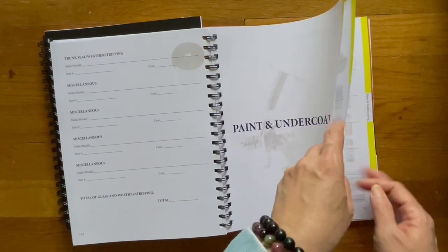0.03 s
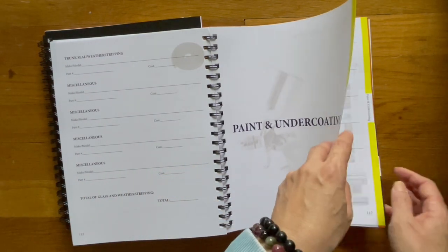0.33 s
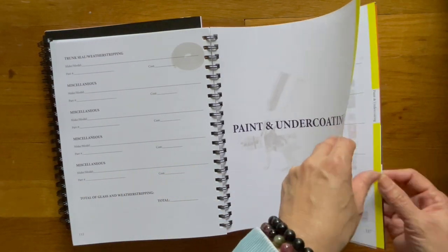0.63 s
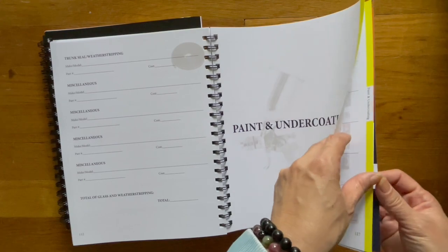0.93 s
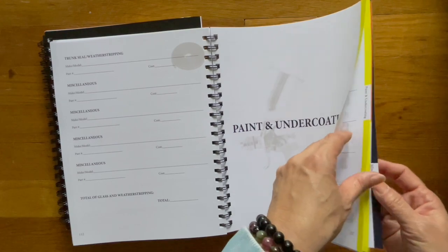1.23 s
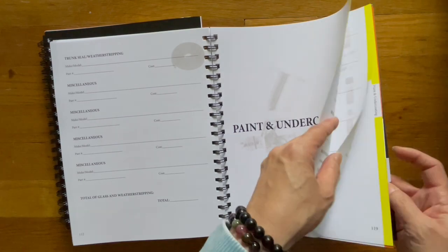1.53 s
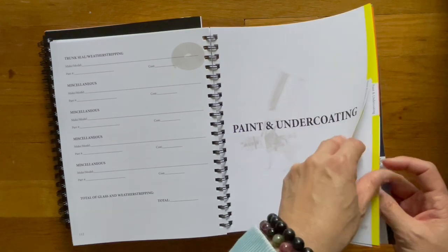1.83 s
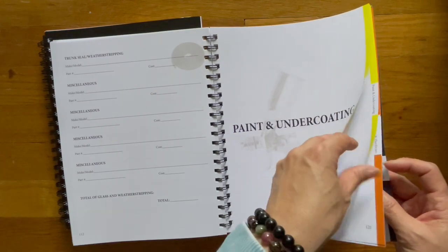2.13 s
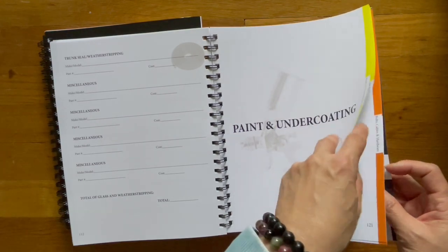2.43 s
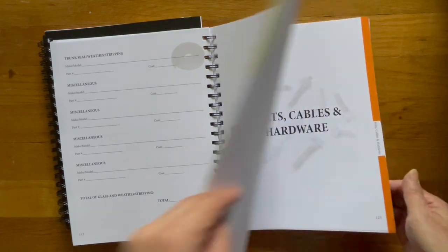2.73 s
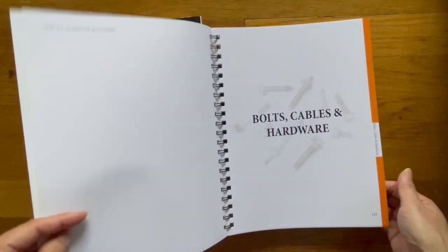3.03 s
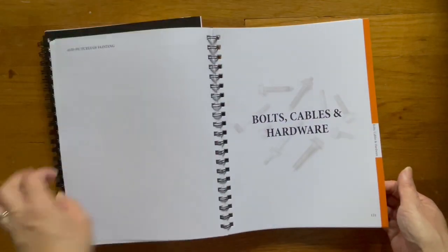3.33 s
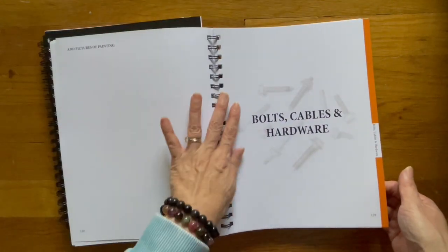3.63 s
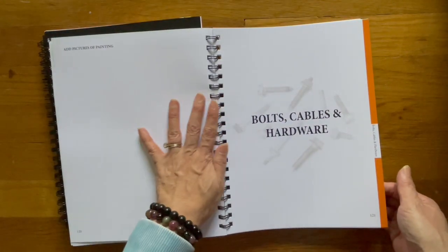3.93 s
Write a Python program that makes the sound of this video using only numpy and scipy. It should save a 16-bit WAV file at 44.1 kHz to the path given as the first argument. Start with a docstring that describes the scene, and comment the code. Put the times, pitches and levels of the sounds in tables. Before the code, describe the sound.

Stiff paper pages rustle as fingers pick through a spiral-bound book. A page swings over with sharp crackles, then a palm slaps and smooths it. Soft table thuds and a faint ticking clock are heard in the quiet room.

```python
"""In a quiet room, where a clock ticks faintly, fingers leaf through a spiral-bound book of stiff paper.
First the sheets slide and rub with a frictional hiss as a page is picked out. The page then bows and
swings over, ringing as it bends and crackling as it buckles. Last it settles, and a palm slaps and
smooths it. Throughout, the handling thuds softly through the wooden table."""
import sys
import numpy as np
from scipy import signal
from scipy.fft import rfft, irfft, next_fast_len
from scipy.io import wavfile

SR = 44100
rng = np.random.default_rng(int(sys.argv[2]) if len(sys.argv) > 2 else 0)


def dump(signal):
    """Clip the signal to [-1, 1] and save it as 16-bit WAV at the path in sys.argv[1]."""
    limited = np.clip(np.atleast_2d(signal).T, -1, 1)
    pcm = np.round(limited * 32767).astype(np.int16)
    wavfile.write(sys.argv[1], SR, pcm)


N = 176400
T = np.arange(N) / SR


def from_db(db):
    """Decibels to amplitude ratio."""
    return 10 ** (np.asarray(db) / 20)


def rms_one(x):
    """Scale to unit rms."""
    return x / np.sqrt(np.mean(x ** 2) + 1e-20)


def at_hz(points, hz):
    """Interpolate on a log-frequency axis."""
    f, v = np.transpose(points)
    return np.interp(np.log(np.maximum(hz, 1)), np.log(f), v)


def filtered(x, response):
    """Linear filtering: multiply the spectrum by a frequency response."""
    size = next_fast_len(x.shape[-1] + 4096)
    return irfft(rfft(x, size) * response(np.fft.rfftfreq(size, 1 / SR)), size)[..., :x.shape[-1]]


def drift(corner_hz, size=N):
    """Random fluctuation: low-passed noise of unit rms."""
    return rms_one(filtered(rng.standard_normal(size), lambda f: 1 / (1 + (f / corner_hz) ** 2)))


def coloured(source, spectrum):
    """Partial coherence: shaped mid and side noises add and subtract into two channels of unit rms."""
    # Each row: frequency in Hz, left-right coherence (clipped to 0..1).
    likeness = [(100, 5), (300, 0.4), (600, 0.2), (1200, 0.44), (2000, 1.3), (3000, -0.1), (4400, .5),
                (6000, 0.83), (8000, 0.95), (9400, .995), (11000, 9), (15000, -5)]
    alike = lambda f: np.clip(at_hz(likeness, f), 0, 1)
    gain = lambda f: from_db(at_hz(spectrum, f))
    mid = filtered(source, lambda f: gain(f) * np.sqrt(1 + alike(f)))
    side = filtered(rng.standard_normal(N), lambda f: gain(f) * np.sqrt(1 - alike(f)))
    return rms_one(np.array([mid + side, mid - side]))


def swells(rows, db_column=3, shape=1.86):
    """Incoherent addition: the envelopes of movements that swell and fade sum in power."""
    power, t = 0, T[::16]
    for row in rows:
        peak_s, rise_s, fall_s = row[:3]
        distance = np.abs(t - peak_s) / np.where(t < peak_s, rise_s, fall_s)
        power += from_db(row[db_column]) ** 2 * np.exp(-np.minimum(distance ** shape, 40))
    return np.interp(T, t, np.sqrt(power))


def add(out, start_s, sound):
    """Superpose a sound at a given time."""
    i = int(np.clip(start_s * SR, 0, N))
    out[i:i + len(sound)] += sound[:N - i]


def room_noise(level_db=-53.5):
    """Stationary noise, strongest in the bass, forms the room's background."""
    # Each row: frequency in Hz, relative spectral density in dB.
    spectrum = [(18, -28), (40, -5), (68, 2), (95, -6.5), (130, -4.5), (200, -15), (320, -17.5),
                (550, -21.5), (900, -24), (1500, -28), (3000, -37.5), (6000, -54.5), (11000, -72),
                (16000, -73)]
    return from_db(level_db) * coloured(rng.standard_normal(N), spectrum)


def clock(first_s=0.561, period_s=0.619, tock_lag_s=0.324, tick_db=-52, tock_db=-64):
    """Modal ringing: a strong and a weak beat excite the same damped modes, blurred by distance."""
    # Each row: frequency in Hz, relative level in dB, time to decay by 60 dB in seconds.
    modes = [(2180, 2.5, 0.22), (2853, -5, 0.29), (3710, 1, 0.22), (4300, -2.5, 0.19), (4920, 5, 0.063),
             (4820, -3.5, 0.26), (5300, -10, 0.19)]
    diffuse_share, blur_hz = 0.74, 170
    out, t = np.zeros((2, N)), T[:SR // 3]
    for beat in range(6):
        for lag_s, db in ((0, tick_db), (tock_lag_s, tock_db)):
            for channel in out:
                ring = 0
                for hz, mode_db, t60 in modes:
                    blur = 1 - diffuse_share + diffuse_share * drift(blur_hz, len(t))
                    tone = np.sin(2 * np.pi * (hz * t + rng.random()))
                    ring += from_db(mode_db - 60 * t / t60) * blur * tone
                add(channel, first_s + beat * period_s + lag_s, from_db(db) * ring)
    return out


def reverberation(x, t60_s=0.23, gain_db=-17):
    """Diffuse reflections arrive after 4 ms and decay exponentially, independently in each channel."""
    # Each row: frequency in Hz, further gain in dB.
    colour = [(100, -16), (400, -4), (1000, -3), (3000, -1), (7000, -3), (9400, -20), (14000, -15)]
    t = T[:SR // 2]
    tail = rng.standard_normal((2, len(t))) * from_db(-60 * t / t60_s) * (t > .004)
    tail = filtered(tail / np.linalg.norm(tail[0]), lambda f: from_db(gain_db + at_hz(colour, f)))
    return signal.fftconvolve(x.mean(axis=0)[None], tail, axes=1)[:, :N]


def thuds():
    """Forced vibration: the table booms as hands press the book on it, and the page pushes air."""
    # Each row: peak time, rise and fall in seconds, level in dB.
    pushes = [(0.085, 0.029, 0.054, -44), (0.55, 0.019, 0.014, -41.5), (0.62, 0.055, 0.058, -44.5),
              (0.85, 0.053, 0.015, -45.5), (1.095, 0.042, 0.022, -43.5), (1.2, 0.059, 0.059, -43),
              (1.375, 0.027, 0.026, -49), (1.67, .02, 0.022, -44), (1.79, 0.048, .05, -46.5),
              (2.015, .012, 0.011, -45), (2.12, 0.031, .05, -46.5), (2.34, 0.056, 0.026, -44),
              (2.49, 0.037, .08, -47), (2.75, 0.071, 0.18, -49), (2.925, 0.028, 0.046, -37.5),
              (3.015, 0.015, 0.063, -44.5), (3.35, 0.031, 0.084, -43), (3.46, 0.024, 0.046, -45),
              (3.85, 0.018, 0.033, -54)]
    # Each row: frequency in Hz, relative spectral density in dB.
    table_spectrum = [(18, -38), (35, -16.5), (54, -8.5), (62, -2.5), (69, 3.5), (76, 0), (88, -9),
                      (125, -8), (170, -16.5), (230, -16.5), (400, -34.5), (900, -93)]
    return swells(pushes) * coloured(rng.standard_normal(N), table_spectrum)


def bending_pulse(colour_db, ring_s, size=4096):
    """Dispersion: a pulse and its scatter arrive lows last. Energy equals 8 ms at unit rms."""
    delay_at_1khz_s, scatter_db = 0.001189, 0.5
    t, f = np.arange(size) / SR, np.fft.rfftfreq(size, 1 / SR)
    scatter = rng.standard_normal(size) * np.exp(-t / ring_s)
    pulse = (t == 0) + from_db(scatter_db) * scatter / np.linalg.norm(scatter)
    travel = np.exp(-4j * np.pi * delay_at_1khz_s * np.sqrt(1000 * f))
    wave = irfft(rfft(pulse) * travel * from_db(colour_db(f)))[:size // 2]
    return wave / np.linalg.norm(wave) * np.sqrt(.008 * SR)


def pats(width_octaves=0.51, top_hz=3150, scrape_decay_s=0.03):
    """Damped impact: a fingertip or loose page pats the stack and trails into a short scrape."""
    # Each row: start in seconds, level over 8 ms in dB, centre frequency in Hz.
    impacts = [(0.364, -58, 710), (0.588, -47, 980), (1.055, -48, 1020), (1.167, -56, 870),
               (1.979, -59.5, 840), (2.648, -34.5, 1140), (2.726, -47.5, 960), (3.410, -67, 910)]
    out, t = np.zeros(N), T[:SR // 5]
    for start_s, db, hz in impacts:
        band_loss = lambda f: 1 + (np.log2((f + 1) / hz) / width_octaves) ** 2
        colour_db = lambda f: -20 * np.log10(band_loss(f) * (1 + (f / top_hz) ** 2))
        scrape = rms_one(filtered(rng.standard_normal(len(t)), lambda f: from_db(colour_db(f))))
        scrape_db = -31 + 0.43 * db   # harder pats scrape louder
        add(out, start_s, from_db(db) * bending_pulse(colour_db, ring_s=0.0049))
        add(out, start_s, from_db(scrape_db) * scrape * np.exp(-t / scrape_decay_s))
    return out


def bends(relative_half_width=0.13):
    """Friction drives a gliding resonance of the bowed sheet: high under a finger, hollow in the swing."""
    # Each row: peak time, rise and fall in seconds, level in dB, centre in Hz, glide in octaves a second.
    resonances = [(1.635, 0.019, 0.03, -43, 1900, 2), (2.195, 0.012, 0.028, -44.5, 1700, 1.5),
                  (2.22, 0.022, 0.044, -49.5, 1100, 0.5), (2.285, 0.036, 0.04, -44, 1950, 1),
                  (2.62, 0.013, 0.01, -47, 2000, -3.5), (2.655, 0.0092, 0.011, -53.5, 400, -14),
                  (2.735, 0.0046, 0.017, -49, 280, -13), (2.835, 0.018, 0.028, -47.5, 3650, -0.5),
                  (2.889, 0.076, 0.071, -52, 2580, -1.5), (2.89, 0.041, .05, -56.5, 240, 1.5),
                  (3.0, 0.012, 0.065, -52, 2650, 0), (3.033, 0.021, 0.034, -48.5, 400, 2),
                  (3.045, .025, 0.021, -53, 820, 0.5)]
    out = np.zeros(N)
    for row in resonances:
        peak_s, _, _, _, hz, glide = row
        octaves = np.clip(glide * (T - peak_s), -1, 1)
        phase = 2 * np.pi * np.cumsum(hz * 2 ** octaves) / SR
        width_hz = relative_half_width * hz
        noise_band = drift(width_hz) * np.cos(phase) + drift(width_hz) * np.sin(phase)
        out += swells([row]) * rms_one(noise_band)
    return out


def sharp_clicks():
    """Impulsive excitation: snaps of the stiff sheet, plus a few faint clock ticks whole seconds apart."""
    # Each row: start in seconds, level over 8 ms in dB, tilt above 700 Hz in dB per octave.
    clicks = [(0.014, -48.5, -4.5), (0.150, -56.5, -11), (0.362, -50, -1.5), (0.369, -63, -2),
              (0.797, -51.5, 0), (1.268, -63, 4), (1.297, -59, -1), (1.338, -54.5, -8), (1.366, -46, -1),
              (1.447, -59, -9), (1.542, -50.5, -8), (1.737, -48.5, 0), (1.885, -49, 1.5), (2.014, -58.5, 3),
              (2.173, -49.5, -4), (2.385, -52.5, -7.5), (2.565, -46.5, -13), (2.617, -46.5, 4),
              (2.629, -54, 4), (2.717, -50.5, 1), (2.7882, -43, 2.5), (2.8069, -35, 1), (2.822, -44, -2),
              (2.831, -40, -5), (2.874, -43.5, -2.5), (2.886, -46, -5.5), (2.894, -44.5, -4),
              (2.902, -44, -3), (2.925, -49.5, -2), (2.981, -43, -3), (3.047, -36.5, 0.5),
              (3.0585, -34.5, -2.5), (3.063, -41.5, -3.5), (3.114, -50.5, 1.5), (3.128, -50.5, 1),
              (3.150, -54, 7), (3.203, -53, 0.5), (3.216, -46, -0.5), (3.262, -41, 1), (3.302, -39, -1),
              (3.306, -39, 1), (3.31, -41.5, 3), (3.3236, -39.5, 3), (3.335, -37, 1.5), (3.366, -48, -1),
              (3.3972, -40, 0), (3.407, -37.5, -1), (3.472, -57.5, 8), (3.590, -37.5, -2),
              (3.595, -35.5, 1.5), (3.601, -36, -2), (3.607, -37, 2), (3.619, -43, 1.5), (3.631, -44.5, -1),
              (3.639, -42.5, 3), (3.8453, -51, -5.5)]
    # Each row: frequency in Hz, relative spectral density in dB.
    spectrum = [(100, -42), (400, -8), (900, 2), (1600, 0), (2700, 4), (4200, -2.5), (5600, 0.5),
                (8000, -1.5), (10700, 4.5), (12000, -5), (13500, -26), (16000, -27)]
    out = np.zeros(N)
    for start_s, db, tilt in clicks:
        colour_db = lambda f: at_hz(spectrum, f) + tilt * np.log2(np.maximum(f, 700))
        add(out, start_s, from_db(db) * bending_pulse(colour_db, ring_s=0.0026))
    return out


def friction(slips_per_s=2500, spread_db=3.5, slip_share=0.46):
    """Stick-slip: fibres catch and let go in uneven impulses over smooth sliding noise."""
    slips = (rng.random(N) < slips_per_s / SR) * rng.choice([-1, 1], N)
    sizes = from_db(spread_db * np.minimum(rng.exponential(1, N), 5))
    smooth = rng.standard_normal(N)
    return np.sqrt(slip_share) * rms_one(slips * sizes) + np.sqrt(1 - slip_share) * smooth


def sliding(judder_db=1.9, judder_hz=29):
    """Friction on paper or skin excites surface hiss, the rubbed sheet's resonance and its low flexing."""
    # Each row: peak time, rise and fall in seconds, then hiss, rub and flex levels in dB.
    strokes = [(0.012, 0.025, 0.012, -48.5, -54, -52), (0.07, 0.041, 0.05, -52, -75, -64),
               (0.115, 0.01, 0.009, -47, -60, -63), (0.28, 0.011, 0.019, -53.5, -61.5, -64.5),
               (0.455, 0.015, 0.017, -55, -53.5, -53), (0.512, 0.016, 0.032, -52.5, -59, -54.5),
               (0.795, 0.044, 0.018, -56, -61.5, -56.5), (0.942, 0.0038, 0.022, -58, -83, -79),
               (1.118, 0.007, 0.011, -55.5, -60, -54), (1.41, 0.021, 0.056, -58, -53.5, -63),
               (1.482, 0.019, 0.05, -43.5, -46, -57.5), (1.63, 0.031, 0.04, -49, -47.5, -59.5),
               (1.74, .012, 0.02, -43, -44, -58), (1.80, 0.026, 0.056, -57, -60, -64),
               (2.135, 0.018, 0.014, -52.5, -51.5, -60), (2.195, 0.016, 0.035, -47, -46, -53),
               (2.25, 0.027, 0.014, -42, -45, -58), (2.305, .03, 0.034, -50.5, -52.5, -72),
               (2.395, 0.012, 0.021, -50, -51, -59), (2.48, 0.031, 0.029, -50.5, -51.5, -55.5),
               (2.57, 0.025, 0.032, -54.5, -54, -61), (2.62, .012, 0.011, -48, -47.5, -46.5),
               (2.646, 0.0072, 0.0047, -45, -47, -42), (2.675, 0.018, 0.018, -56, -62, -57),
               (2.725, 0.0054, 0.016, -49.5, -57, -47.5), (2.79, 0.02, 0.011, -40.5, -49, -48.5),
               (2.825, 0.0083, 0.019, -42.5, -46.5, -48), (2.90, 0.016, .02, -54.5, -48.5, -51),
               (2.938, 0.0088, 0.0098, -47.5, -45, -47.5), (2.993, 0.016, 0.014, -44, -48.5, -47),
               (3.035, 0.026, 0.038, -51, -60, -49.5), (3.18, 0.034, 0.017, -53.5, -70, -65.5),
               (3.262, 0.033, 0.015, -46, -58, -64.5), (3.315, 0.0079, .02, -42, -54, -49),
               (3.41, 0.0067, 0.012, -66, -58, -50), (3.602, 0.0057, 0.012, -41.5, -46.5, -47.5),
               (3.636, 0.0098, 0.019, -50.5, -59, -51.5), (3.75, 0.047, 0.067, -48, -54, -57),
               (3.945, 0.03, 0.058, -53.5, -81, -60)]
    # Each row: time in seconds, hiss level in dB under lightly resting fingers.
    light_contact = [(0, -72), (0.2, -70.5), (0.35, -62.5), (0.58, -75), (0.66, -76), (0.84, -64.5),
                     (0.9, -82), (1.03, -65.5), (1.35, -66), (1.86, -67), (1.955, -76), (2.0, -70.5),
                     (2.09, -70), (2.4, -64), (3.1, -66), (3.42, -56), (3.51, -80), (3.58, -85), (4, -69)]
    # Each row of these three spectra: frequency in Hz, relative spectral density in dB.
    hiss_spectrum = [(500, -46), (1500, -9), (2800, 2.5), (4200, -0.5), (5500, 0.5), (6500, 1), (8000, 2),
                     (9500, 3), (10800, 4.5), (11600, -4.5), (12500, -17), (14000, -50), (16000, -36)]
    rub_spectrum = [(400, -39), (900, -5), (1400, -2.5), (1900, 0.5), (2300, -1.5), (3000, -11),
                    (4200, -22.5), (8000, -53)]
    flex_spectrum = [(60, -3), (200, 0.5), (350, -1.5), (520, -3.5), (850, 2), (1200, -8), (2000, -17.5),
                     (5000, -51)]
    resting = from_db(np.interp(T, *np.transpose(light_contact)))
    hiss = np.hypot(swells(strokes), resting) * coloured(friction(), hiss_spectrum)
    rub = swells(strokes, db_column=4) * coloured(friction(), rub_spectrum)
    flex = swells(strokes, db_column=5) * coloured(friction(), flex_spectrum)
    return (hiss + rub + flex) * from_db(judder_db * drift(judder_hz))


def scene():
    """Superposition at two microphones: paper and clicks reach the left first, amid the room's sound."""
    # Each row: frequency in Hz, phase lead of the left channel in radians.
    lead = [(0, 0), (300, -.1), (800, -.95), (1350, .05), (3700, .65), (4100, 1.0), (4650, 2.4),
            (5170, 4.8), (5900, 6.1), (7920, 8.7), (9500, 9.45), (12000, 12.4), (13700, 12.7),
            (15200, 15.5)]
    # Each row: frequency in Hz, left minus right level in dB.
    balance = [(60, 2.3), (160, 2.5), (350, 3.5), (700, 4), (1400, -0.5), (2800, -0.6), (5600, -1.7),
               (11000, 0.5)]
    sides = np.array([[.5], [-.5]])
    foreground = sliding() + bends() + sharp_clicks() + pats()
    direct = filtered(foreground, lambda f: np.exp(1j * sides * np.interp(f, *np.transpose(lead))))
    whole = direct + reverberation(foreground) + thuds() + clock() + room_noise()
    return filtered(whole, lambda f: from_db(sides * at_hz(balance, f)))


def record(dry, cutoff_hz=15900):
    """Band limiting: an elliptic low-pass cuts the top steeply."""
    return signal.sosfilt(signal.ellip(10, .1, 80, cutoff_hz, fs=SR, output="sos"), dry)


dry = scene()
out = record(dry)
dump(out)
```